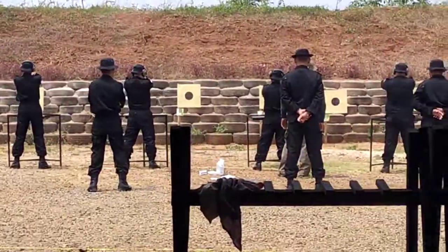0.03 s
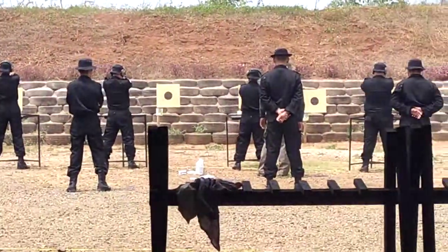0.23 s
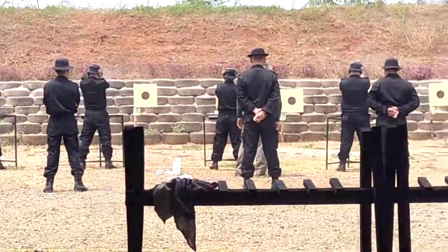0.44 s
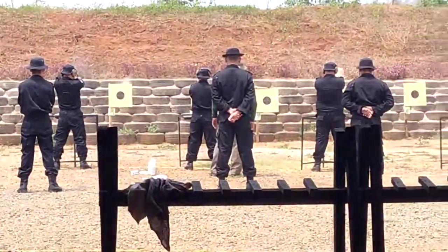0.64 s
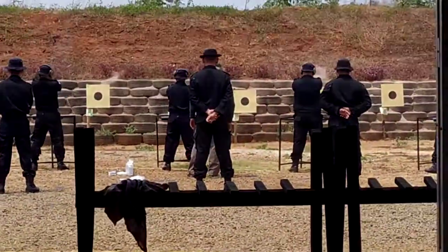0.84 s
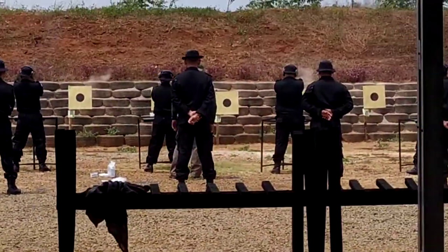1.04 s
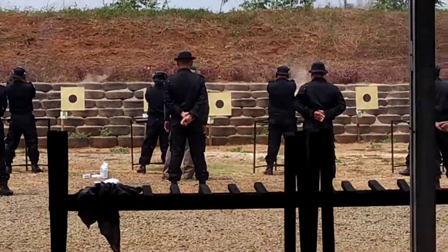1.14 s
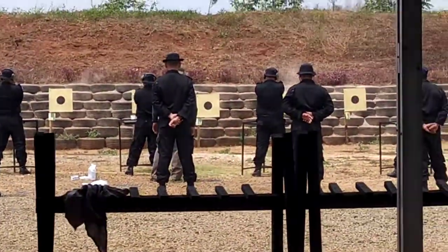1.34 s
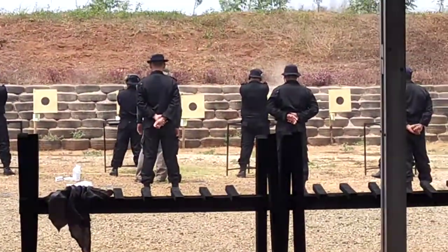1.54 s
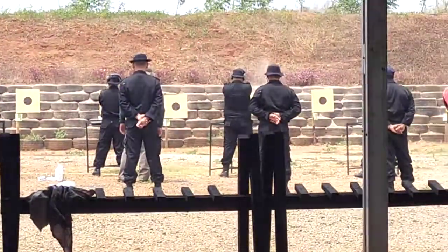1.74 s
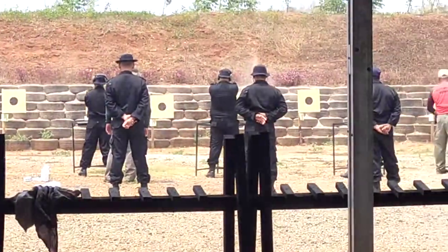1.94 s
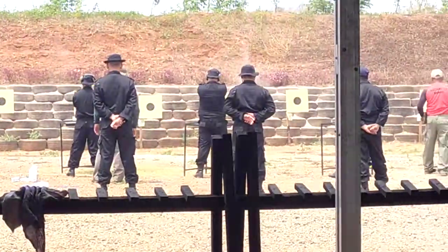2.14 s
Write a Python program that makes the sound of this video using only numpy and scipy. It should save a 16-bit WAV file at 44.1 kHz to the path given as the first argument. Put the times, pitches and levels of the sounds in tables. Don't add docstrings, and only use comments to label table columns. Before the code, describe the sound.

Three pistol shots fire almost together on an outdoor range, slapping off an earth bank and rattling round a shelter, then rolling away; small knocks and tinkling brass follow, with the close microphone overloading.

```python
import sys
import numpy as np
from scipy import signal
from scipy.io import wavfile
from scipy.ndimage import uniform_filter1d

SR = 44100
rng = np.random.default_rng(int(sys.argv[2]) if len(sys.argv) > 2 else 0)


def gain_from_db(level_db):
    decades = np.asarray(level_db, float) / 20
    return 10 ** decades


def to_wav(s):
    ch = np.atleast_2d(s).T
    pcm = np.round(np.clip(ch, -1, 1) * 32767)
    wavfile.write(sys.argv[1], SR, pcm.astype(np.int16))


N = 97020

# pitch_hz, level_db [dB per Hz]
VALLEY_COLOUR = [(60, -28.5), (150, -7.5), (367, -11.5), (559, -7.5), (1550, -22), (5000, -31.5),
                 (12000, -42), (16000, -60)]
# pitch_hz, level_db [dB per Hz]
BREEZE_COLOUR = [(30, -7.5), (60, -2), (190, -5.5), (420, -16), (610, -10), (1330, -22.5), (7000, -30.5),
                 (15600, -46)]
# pitch_hz, likeness [-1 to 1]
OPEN_AIR_LIKENESS = [(60, 1), (240, 0.77), (950, -0.52), (3770, -0.16), (15000, 0.55)]
# pitch_hz, left_over_right_db
OPEN_AIR_BALANCE = [(60, 1.5), (380, -1), (2380, 2.0), (15000, 10.5)]
# start_s, level_db [peak], pitch_hz, t60_s, left_over_right_db
KNOCKS = [(.017, -42.5, 454, 0.033, 2), (.01, -55.5, 952, 0.4, 0), (.04, -60.5, 1490, 0.53, 0),
          (0.123, -49, 90, 0.12, -17), (1.079, -36, 180, .12, 2), (1.105, -56, 262, 0.041, -1.5),
          (1.248, -36.5, 198, 0.098, 0), (1.328, -40, 202.6, 0.073, -1), (1.408, -44.5, 940, 0.018, -2),
          (1.457, -45, 1101, 0.012, -2), (1.53, -38, 464, 0.023, -22), (1.531, -52, 3700, 0.007, -7),
          (1.264, -41, 553.6, 0.043, -3.5), (1.53, -48, 2250, 0.0049, -5.5), (1.71, -46.5, 250, .05, -4),
          (1.711, -53, 1000, 0.058, 0), (1.532, -44, 1200, 0.0057, -28), (1.53, -45, 120, 0.13, -11),
          (1.531, -43, 262, .03, -10), (1.5545, -39, 1140, 0.014, 0), (1.5552, -42.5, 2530, 0.0068, 1),
          (1.564, -53, 400, 0.017, -2), (1.712, -44, 582, 0.054, 0)]
# start_s, ring_db, pitch_hz, t60_s, tick_db
CASES = [(0.157, -79.5, 6340, .05, -59.5), (1.141, -63, 11140, .35, -50), (1.176, -72, 9060, .1, -54.5),
         (1.434, -62, 11100, 0.42, -57), (1.455, -73, 7640, .08, -56), (1.53, -66, 7300, 0.3, -58.5),
         (1.565, -65, 5900, .35, -64), (1.87, -78.5, 9490, 6, -67), (1.86, -72, 9070, 4.4, -71),
         (1.89, -72, 3752, 1.4, -69), (1.97, -73, 7000, 1.28, -67), (2.09, -64.5, 2940, 0.44, -66)]
# start_s, level_db, boom_db, boom_pitch_hz, thump_db
FRONTS = [
    (0.2332, 7, 1, 820, -15),
    (.288, 8.5, 1, 850, -17),
    (.3795, 11.5, 0.5, 600, -18),
    (0.436, 9, -4, 900, -17.5),
    (.528, 9, -2, 520, -8.5),
    (.584, -0.5, -7, 950, -2.5),
    (0.622, 1, -5, 950, -29),
]
# pitch_hz, level_db [dB per Hz]
SHELTER_COLOUR = [(40, -44), (110, -30.5), (200, -6.5), (510, -5.5), (1390, -5), (5340, -6), (9000, -9),
                  (15500, -22.5)]
# pitch_hz, t60_s
SHELTER_DECAY = [(100, 0.15), (250, 0.41), (600, 0.54), (2000, 0.48), (6000, 0.45), (11000, 0.33),
                 (15000, 0.39)]
# pitch_hz, left_over_right_db
SHELTER_BALANCE = [(60, 4), (240, -1.5), (950, 1), (3770, 2), (15000, 14.5)]
# pitch_hz, likeness [0 to 1]
SHELTER_LIKENESS = [(60, .7), (240, 0.96), (600, 0.95), (1100, 0), (2000, 0.013), (15000, 0)]


def evened(x):
    return x / np.sqrt(np.mean(x ** 2) + 1e-20)


def read(points, hz):
    f, value = np.transpose(points)
    return np.interp(np.log(hz + 1), np.log(f + 1), value)[:, None]


def add(mix, start_s, sound):
    at = round(start_s * SR)
    sound = sound[:, max(-at, 0):]
    part = mix[:, max(at, 0):][:, :sound.shape[1]]
    part += sound[:, :part.shape[1]]


def panned(x, left_over_right_db):
    half_db = left_over_right_db / 2
    return x * gain_from_db(np.array([[half_db], [-half_db]]))


def band_noise(shape, low_hz, high_hz):
    b, a = signal.butter(2, [low_hz, high_hz], "band", fs=SR)
    return signal.lfilter(b, a, rng.standard_normal(shape))


def haze(size, order, colour, same, balance, t60, lump_db):
    hop = order // 4
    frames, hz = size // hop + 5, np.fft.rfftfreq(order, 1 / SR)
    a, b, c, d, lumps = rng.standard_normal((frames, len(hz), 5)).T
    lumps = uniform_filter1d(lumps, size=order // 64, axis=0)
    lumps = evened(uniform_filter1d(lumps, size=2048 // hop, axis=1))

    like = np.clip(read(same, hz), -1, 1)
    left = a + 1j * b
    right = like * left + np.sqrt(1 - like ** 2) * (c + 1j * d)
    half_db = read(balance, hz) / 2
    z = np.array([left * gain_from_db(half_db), right * gain_from_db(-half_db)])

    level = gain_from_db(read(colour, hz))
    decay_db = 60 * np.arange(frames) * hop / SR / read(t60, hz)
    z *= level / np.sqrt(np.mean(level ** 2)) * gain_from_db(lump_db * lumps - decay_db)
    sound = signal.istft(z, nperseg=order, noverlap=order - hop)[1]
    return sound[:, :size] / np.sqrt(1.5 * order)


def valley(level_db):
    echoes = haze(2 * SR, order=1024, colour=VALLEY_COLOUR, same=OPEN_AIR_LIKENESS,
                  balance=OPEN_AIR_BALANCE, t60=[(100, 2.39)], lump_db=1.2)
    return gain_from_db(level_db - 40.5) * echoes


def valley_rolls():
    mix = np.zeros((2, N))
    add(mix, -0.38, valley(-0.5))
    add(mix, FRONTS[4][0], valley(15))
    return mix


def puff(t):
    middle_s, width_s, level_db, cut_hz = 1.35, 0.32, -54.5, 108
    low_pass = signal.butter(3, cut_hz, fs=SR, output="sos")
    low = evened(signal.sosfilt(low_pass, rng.standard_normal((3, N))))
    swell = np.exp(-((t - middle_s) / width_s) ** 2)
    return gain_from_db(level_db) * swell * (low[2] + 0.6 * low[:2])


def rustle(t):
    start_s, rise_s, level_db = 1.6, 0.15, -65
    swell = np.clip((t - start_s) / rise_s, 0, 1)
    return gain_from_db(level_db) * swell * panned(band_noise((2, N), 2955, 11500), 4.4)


def breeze():
    t = np.arange(N) / SR
    air = haze(N, order=2048, colour=BREEZE_COLOUR, same=OPEN_AIR_LIKENESS,
               balance=OPEN_AIR_BALANCE, t60=[(100, 1e4)], lump_db=0.0)
    return gain_from_db(-48) * air + puff(t) + rustle(t)


def knocks():
    mix, t = np.zeros((2, N)), np.arange(SR // 4) / SR
    for start_s, level_db, pitch_hz, t60_s, lr_db in KNOCKS:
        drift = evened(uniform_filter1d(rng.standard_normal(len(t)), size=150))
        roughness = min(2.6 * t60_s, 0.25)
        warped_s = np.cumsum(1 + roughness * drift) / SR
        ring = -gain_from_db(level_db - 60 * t / t60_s) * np.sin(2 * np.pi * pitch_hz * warped_s)
        add(mix, start_s, panned(ring, lr_db))
    return mix


def cases():
    mix, t = np.zeros((2, N)), np.arange(SR // 2) / SR
    for start_s, ring_db, pitch_hz, t60_s, tick_db in CASES:
        tick = gain_from_db(tick_db - 60 * t / 0.055) * band_noise((2, len(t)), 5000, 12000)
        tumble = 1 + 0.4 * evened(uniform_filter1d(rng.standard_normal(len(t)), size=500))
        swell = np.minimum(t / 0.013, 1) * gain_from_db(ring_db - 60 * t / t60_s)
        ring = swell * tumble * np.sin(2 * np.pi * pitch_hz * t)
        add(mix, start_s, tick + panned(ring, 10))
    return mix


def blast(u):
    return (u > 0) * gain_from_db(1.5) * (1 - u) * np.exp(-u)


def thump(t, level_db):
    pitch_hz, t60_s = 175, 0.029
    note = np.sin(2 * np.pi * pitch_hz * t / (1 + 15 * t))
    return panned(gain_from_db(level_db - 60 * t / t60_s) * note, -1.5)


def boom(t, pitch_hz):
    width_hz, t60_s, rise_s = 420, 0.14, 0.018
    radius = np.exp(-np.pi * width_hz / SR)
    poles = [1, -2 * radius * np.cos(2 * np.pi * pitch_hz / SR), radius ** 2]
    noise = rng.standard_normal((3, len(t)))
    band = signal.lfilter([1, 0, -1], poles, noise[2] + 0.45 * noise[:2])
    band = signal.lfilter([1], poles, band)
    return panned(evened(band), -3.5) * (1 - np.exp(-t / rise_s)) * gain_from_db(-60 * t / t60_s)


def arrival(level_db, boom_db, boom_hz, thump_db):
    blast_s, right_lag_s = 0.00017, 0.00005
    t = np.arange(SR) / SR
    u = np.maximum(np.array([t, t - right_lag_s]), 0) / blast_s
    dense = haze(SR, order=512, colour=SHELTER_COLOUR, same=SHELTER_LIKENESS,
                 balance=SHELTER_BALANCE, t60=SHELTER_DECAY, lump_db=-0.5)
    hollow = gain_from_db(boom_db) * boom(t, boom_hz)
    return gain_from_db(level_db) * (blast(u) + thump(t, thump_db) + hollow + (u > 0) * dense)


def shots():
    mix = np.zeros((2, N))
    for start_s, *front in FRONTS:
        add(mix, start_s, arrival(*front))
    return mix


def scene():
    return valley_rolls() + breeze() + knocks() + cases() + shots()


def limiter(x):
    knee_db, squeeze, recover_db_per_s = -7.5, 0.72, 148.5
    power_db = 10 * np.log10(abs(uniform_filter1d(x ** 2, size=256, origin=127)) + 1e-12)
    fall_db = np.arange(N) * recover_db_per_s / SR
    held_db = np.maximum.accumulate(power_db + fall_db, axis=1) - fall_db
    over_db = np.maximum(held_db - knee_db, 0)
    return x / gain_from_db(squeeze * uniform_filter1d(over_db, size=64, origin=31))


def band_limit(x):
    return signal.sosfilt(signal.butter(12, 15760, fs=SR, output="sos"), x)


def record(dry):
    ceiling = 1.2
    flat = np.clip(ceiling * np.tanh(limiter(dry) / ceiling), -1, 1)
    low_cut = signal.butter(3, 45, "high", fs=SR, output="sos")
    return band_limit(signal.sosfilt(low_cut, flat))


dry = scene()
out = record(dry)
to_wav(out)
```